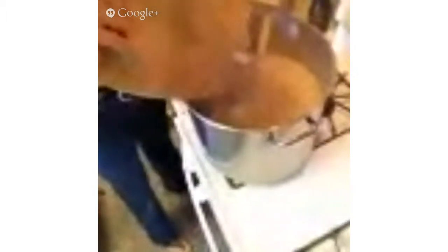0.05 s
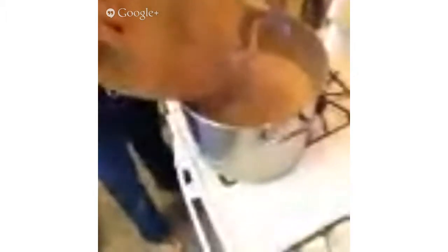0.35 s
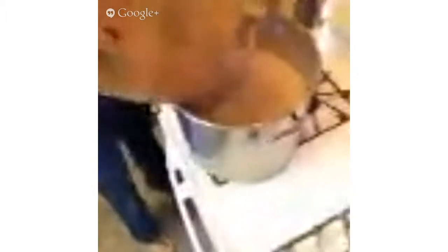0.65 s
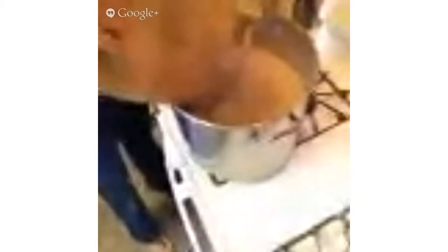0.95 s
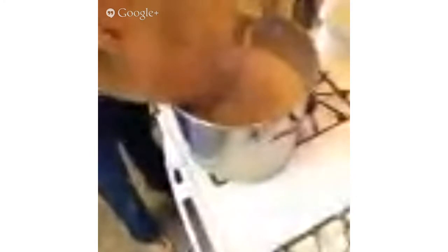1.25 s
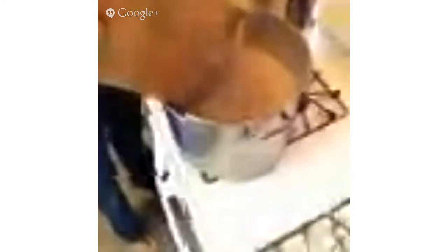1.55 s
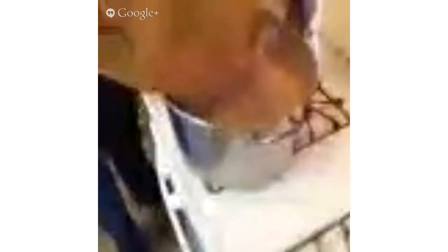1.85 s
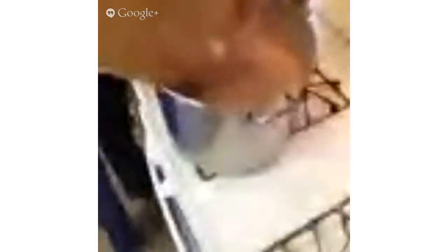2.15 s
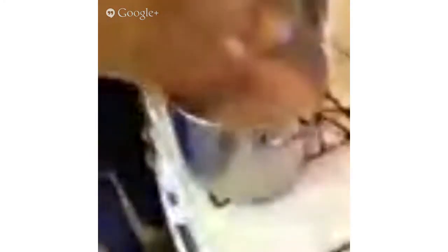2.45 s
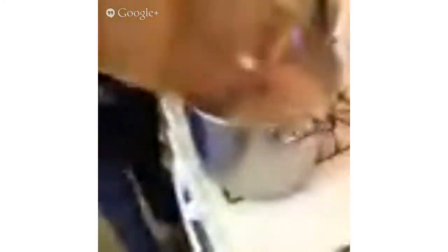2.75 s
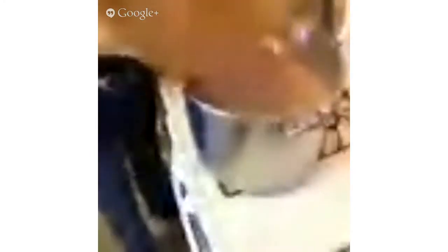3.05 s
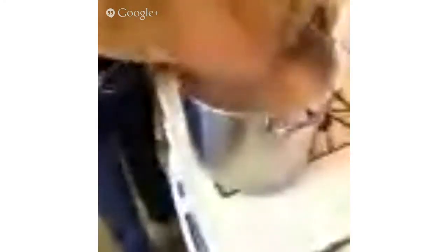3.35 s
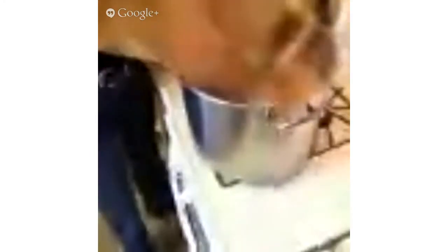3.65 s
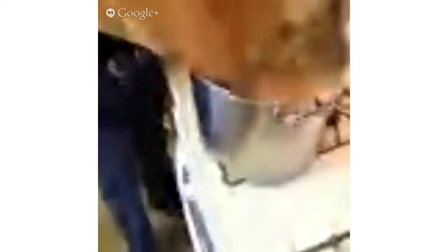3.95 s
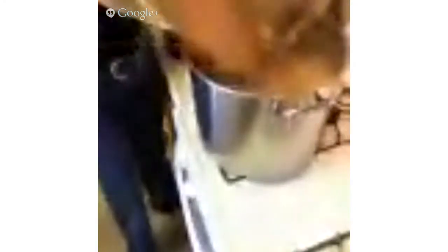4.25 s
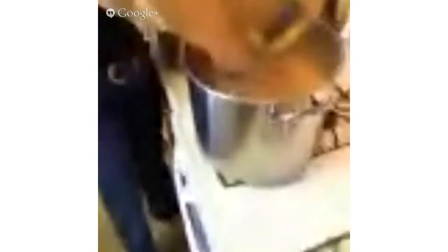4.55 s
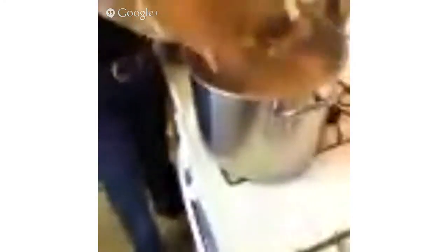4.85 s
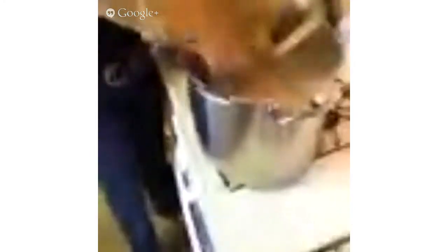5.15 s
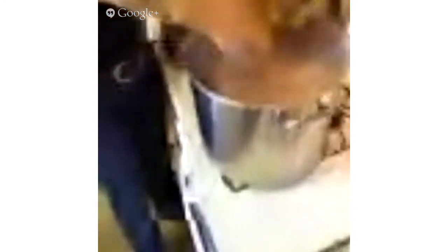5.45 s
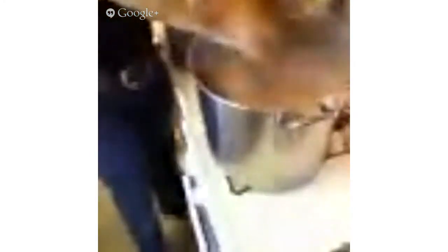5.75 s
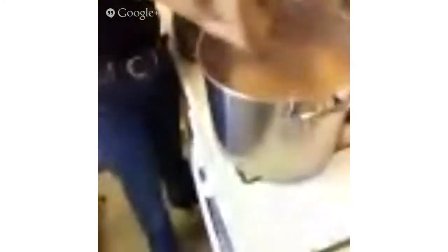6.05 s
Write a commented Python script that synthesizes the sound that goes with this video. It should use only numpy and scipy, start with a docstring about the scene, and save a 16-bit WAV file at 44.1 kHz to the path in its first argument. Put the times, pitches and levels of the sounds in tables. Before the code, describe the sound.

Dry grain slides from a crumpling paper sack and hisses into a metal pot of water, with low bumps on the microphone.

```python
"""A small kitchen, where dry grain is poured from a paper sack into a metal pot of water.
Husks scrape along the tilted sack in surges while a hand bumps and knocks the microphone's case.
Then thousands of ticking kernels hiss into the ringing pot and patter on the wet heap; the stream
pulses as the sack is shaken, and thins out. The paper walls flap with a hollow note, crumple,
snap and puff out air."""
import sys
import numpy as np
from scipy import signal
from scipy.fft import rfft, irfft
from scipy.io import wavfile

SR = 44100
rng = np.random.default_rng(int(sys.argv[2]) if len(sys.argv) > 2 else 0)


def master(y):
    """Save y as 16-bit WAV."""
    cut = np.clip(np.atleast_2d(y).T, -1, 1)
    pcm = np.round(cut * 32767)  # scale
    wavfile.write(sys.argv[1], SR, pcm.astype(np.int16))


N = 269035
TIME = np.arange(N) / SR
AGE = np.arange(SR // 5) / SR  # time since the start of a short event

# room tone: (frequency [Hz], level [dB])
ROOM_TONE_EQ = [(20, 0), (70, -1), (150, -10), (300, -11), (600, -18), (1500, -28), (3000, -34),
                (7500, -39)]
# the hand shifts on the microphone's case: (time [s], level [dB])
HANDLING = [(0, -55), (0.6, -56.5), (1.38, -48.5), (1.54, -14), (1.72, -29.5), (1.9, -25.5), (2.24, -30),
            (2.4, -50.5), (2.97, -46), (3.4, -33.5), (3.55, -58), (4.4, -58), (4.7, -48), (5.15, -65),
            (5.55, -68.5), (5.77, -34), (6.1, -53)]
# rumble through the case: (frequency [Hz], level [dB])
RUMBLE_EQ = [(20, 5.5), (55, 0.5), (120, -5), (200, -16), (300, -29.5), (500, -40), (1200, -59.5),
             (4000, -92.5)]
# soft bumps of the hand, and the case wobbling on after the last knock: (time [s], level [dB], pitch [Hz],
# swell [s])
BUMPS = [(0.1, -41, 45, 0.017), (0.226, -37.5, 68.6, 0.0099), (0.415, -39, 54.7, 0.014),
         (1.487, -8, 107.5, 0.0094), (1.543, -17, 142.5, 0.002), (1.578, -9.5, 74.7, 0.01),
         (1.876, -15.5, 76.5, 0.0048), (1.915, -14.5, 72, 0.0038), (2.072, -24, 100, 0.0036),
         (2.136, -14, 69, 0.012), (2.209, -23, 30, 0.03)]
# grain creeping between the surges: (time [s], level [dB])
CREEP = [(.1, -82), (.18, -70), (.39, -73), (.45, -54.5), (.95, -51), (1.39, -58), (1.47, -75),
         (1.75, -100)]
# surges of grain as the sack tips: (time [s], length [s], level [dB], note [Hz])
SURGES = [(0.292, .019, -65, 1150), (0.414, 0.029, -47.5, 1090), (0.477, 0.019, -47, 1100),
          (.54, 0.066, -47.5, 1200), (0.574, .08, -48, 1380), (0.71, 0.094, -40.5, 1100),
          (0.827, 0.068, -37, 1190), (0.978, 0.069, -30.5, 1350), (1.079, 0.059, -29.5, 1650),
          (1.163, 0.099, -29, 1550), (1.343, .024, -32.5, 1300)]
# husks on paper: (frequency [Hz], level [dB])
SLIDE_EQ = [(88, -39), (150, -12), (249, -3.5), (300, 0.5), (414, -9.5), (500, -3), (837, -2), (1160, -3),
            (1300, -8), (1650, -6.5), (2460, -9.5), (4820, -7.5), (5320, -16.5), (6690, -18.5),
            (7500, -22.5), (9750, -67)]
# resonances of the sack's hollow: (frequency [Hz], width [Hz], level [dB])
SACK_MODES = [(310, 31, -0.5), (510, 84, 2), (1140, 46, 3), (1550, 39, -3), (1840, 71, -1)]
# soft scrapes of paper on paper: (time [s], level [dB], swell [s])
SCRAPES = [(.158, -62.5, 0.015), (.222, -67, .014), (.292, -59, .013)]
# tone of a scrape: (frequency [Hz], level [dB])
SCRAPE_EQ = [(200, -8), (480, 1), (750, -6), (1150, 2), (1900, -12), (2400, -20), (7500, -28)]
# a wall of the sack flaps: (time [s], level [dB], note [Hz], swell [s])
FLAPS = [(0.998, -15, 285, 0.00095), (1.398, -26, 280, 0.0035), (2.302, -19.5, 316, 0.0045),
         (2.543, -19, 305, 0.0083), (2.667, -10.5, 557, 0.0028), (3.71, -9, 537, 0.0074),
         (3.828, -10, 875, 0.0029), (4.043, -13.5, 548, 0.0042), (4.071, -17.5, 550, 0.0049),
         (4.771, -14.5, 589, 0.0054), (4.931, -18, 531, 0.0048), (5.259, -24.5, 640, 0.0039),
         (5.31, -21.5, 657, 0.0043), (5.336, -29, 698, 0.0047), (5.48, -32, 610, .007),
         (5.609, -15.5, 1033, 0.0029), (5.611, -16, 616, 0.0032), (5.627, -14.5, 530, 0.0041),
         (5.672, -12.5, 502, 0.0028), (5.921, -17.5, 530, 0.0044), (5.964, 0, 517, 0.003)]
# finger knocks on the case: (time [s], level [dB], pitch [Hz], decay [s], relative click level [dB])
KNOCKS = [(1.8846, -29, 108, .003, -39), (1.9298, -28.5, 110, 0.0033, -16), (2.1824, -8, 115, 0.0073, -15),
          (2.1978, 0.5, 127, 0.0094, -14), (2.2087, 11, 208, 0.001, -18)]
# click of a knock: (frequency [Hz], level [dB])
CLICK_EQ = [(300, 8), (1200, -8.5), (2500, -21), (7400, -14.5)]
# faders of the pour: (time [s], falling hiss [dB], patter on the wet heap [dB])
STREAM = [(2.2, -61, -66), (2.29, -32, -38), (2.36, -35, -41.5), (2.57, -18.5, -23), (2.82, -22, -26.5),
          (3.05, -32, -31.5), (3.36, -30, -33.5), (3.53, -24.5, -26.5), (3.75, -20, -24),
          (4.03, -18.5, -22), (4.35, -21, -26.5), (4.65, -19, -24), (4.95, -19.7, -25.5),
          (5.16, -23.5, -46.5), (5.35, -22, -44.5), (5.55, -25, -40.5), (5.78, -28.5, -38.5),
          (6.1, -39, -42.5)]
# the kernels run out before the dust does, so the hiss gets brighter: (time [s], kernel level [dB])
KERNELS = [(2.2, -0.5), (2.6, -1.5), (3.2, -6.5), (4.95, 1), (5.22, 0), (5.4, -8), (5.55, -19), (6.1, -14)]
# falling kernels: (frequency [Hz], level [dB])
KERNEL_EQ = [(100, -46.5), (450, -35.5), (700, -13.5), (1000, -10.5), (1750, -9.5), (2100, -2), (2500, -3),
             (3000, 1), (3800, 4), (4800, -0.5), (5400, -0.5), (7400, -9.5)]
# falling dust: (frequency [Hz], level [dB])
DUST_EQ = [(100, -53.5), (450, -44.5), (700, -20.5), (1700, -31.5), (2130, -17), (2500, -19), (3500, -5.5),
           (4400, 1), (5200, -2.5), (5600, 3), (6800, 4), (7400, -0.5)]
# landings on the heap: (frequency [Hz], level [dB])
PATTER_EQ = [(25, -18.5), (120, -16), (200, -11), (310, -5), (400, -9.5), (550, 0.5), (850, -0.5),
             (1700, 0), (2600, 0), (4000, -2), (7500, -11)]
# air resonances of the open pot: (frequency [Hz], width [Hz], level [dB])
POT_MODES = [(694, 21, 11.5), (1110, 60, 3.5), (2120, 54, 7), (2400, 50, -1.5), (3180, 70, -9.5),
             (4870, 280, -0.5)]
# the pot rings more freely once the sack lifts off its mouth: (time [s], ring level [dB])
POT_OPENING = [(2.2, -4), (4.8, -1.5), (5.1, 1.5), (5.4, 0), (5.7, -1.5)]
# the sack crumples: (time [s], flap [dB], shaking sheet [dB], cracking creases [dB], swell [s])
CRUMPLES = [(2.565, -11, -25, -13.5, 0.002), (2.648, -9.5, -21, -26, 0.0052),
            (2.844, -5, -15.5, -16, 0.0066), (2.866, -8, -15.5, -22, 0.0042),
            (2.895, -8.5, -8.5, -16, 0.0025), (2.933, -10.5, -22.5, -20, 0.0036),
            (2.954, -4.5, -15, -32, 0.0052), (2.968, -12.5, -26, -14, 0.0056),
            (2.988, -7.5, -15, -13, 0.0049), (3.085, -15.5, -10.5, -20, 0.0041),
            (3.103, -12, -12.5, -36, 0.0037), (3.128, -27, -20, -32, 0.0024),
            (3.142, -28, -18, -20, 0.0033), (3.151, -9.5, -17, -26, 0.0055),
            (3.212, -23, -20.5, -20.5, 0.0044), (3.246, -6, -19, -31.5, 0.0039),
            (3.279, -11.5, -21.5, -35, 0.0064), (3.303, -28, -21, -37, 0.0024),
            (3.371, -22, -22.5, -32, .006), (3.391, -15.5, -13, -19, 0.0058),
            (3.403, -10, -17.5, -29, 0.0058), (3.48, -16.5, -18.5, -44, 0.0018),
            (3.758, -13.5, -16, -19, 0.0062), (5.752, -25, -25, -28.5, 0.007),
            (5.766, -7, -14.5, -12.5, 0.0095), (5.785, -22.5, -13.5, -15.5, 0.0081),
            (5.829, -30.5, -25.5, -24.5, 0.012)]
# body of the shaking sheet: (frequency [Hz], level [dB])
SHEET_EQ = [(25, 1.5), (120, -3), (310, 1.5), (420, -5), (550, 7), (800, 1), (1250, 2.5), (2000, -1.5),
            (3200, -14), (7500, -38)]
# crisp top of the creases: (frequency [Hz], level [dB])
CREASE_EQ = [(200, -19), (1200, -25), (2400, -1), (4900, -2), (5400, -3.5), (7400, -8)]
# folds snap: (time [s], ring level [dB], ring pitch [Hz])
SNAPS = [(2.568, -4.5, 3120), (2.897, -1.5, 1490), (2.9926, -12, 3420)]
# air squeezed out of the sack: (time [s], level [dB], swell [s])
PUFFS = [(2.65, -21.5, .006), (2.985, -15, 0.0053), (3.267, -23, 0.0053), (3.303, -25.5, .003),
         (3.371, -19, 0.0064), (3.401, -15, 0.0075), (5.747, -23.5, 0.0055)]
# tone of a puff: (frequency [Hz], level [dB])
PUFF_EQ = [(50, -15.5), (130, -2.5), (240, -0.5), (330, 0), (450, -6), (800, -24.5), (2000, -51)]
# reverb of the kitchen: (frequency [Hz], time to fall 60 dB [s])
KITCHEN_DECAY = [(150, 0.25), (600, 0.27), (2500, 0.15), (7500, 0.22)]


def amp(db):
    """Decibels to gain."""
    return 10 ** (np.asarray(db) / 20)


def unit_rms(x):
    """Scales to rms 1."""
    return x / np.sqrt(np.mean(x ** 2) + 1e-20)


def lookup(points, hz):
    """Reads a table on a log-frequency axis."""
    freqs, values = np.transpose(points)
    return np.interp(np.log(hz + 1), np.log(freqs + 1), values)


def fader(curve, column=1):
    """Gain at every sample from one dB column of a curve; silent before the curve starts."""
    rows = np.array(curve)
    return amp(np.interp(TIME, rows[:, 0], rows[:, column])) * (TIME >= rows[0, 0])


def eq(x, points):
    """Shapes x with an EQ curve, at rms 1."""
    gain = amp(lookup(points, np.fft.rfftfreq(len(x), 1 / SR)))
    return unit_rms(irfft(rfft(x) * gain, len(x)))


def dull(x, hz):
    """Rolls off the treble above hz."""
    return signal.sosfilt(signal.butter(4, np.clip(hz, 100, SR / 3), fs=SR, output="sos"), x)


def steep_cut(x, hz):
    """A steep low-pass at hz."""
    return signal.oaconvolve(x, signal.firwin(141, hz, window=("kaiser", 7), fs=SR)[None], "same")


def resonate(x, hz, width_hz):
    """A resonance of gain 1 that follows the curve hz."""
    carrier = np.exp(2j * np.pi * np.cumsum(hz) / SR)
    pole = np.exp(-np.pi * width_hz / SR)
    return 2 * (carrier * signal.lfilter([1 - pole], [1, -pole], x / carrier)).real


def wander(size, hz):
    """Smooth random modulation of rms 1, rolling off above hz."""
    spectrum = rfft(rng.standard_normal(size))
    return unit_rms(irfft(spectrum * np.exp(-(np.fft.rfftfreq(size, 1 / SR) / hz) ** 2), size))


def impacts(size, per_s, spread_db):
    """Clicks of random strength and sign at random moments."""
    strength = amp(spread_db * np.minimum(rng.exponential(1, size), 4))
    return unit_rms(strength * rng.choice([-1, 1], size) * (rng.random(size) < per_s / SR))


def swell(peak_s):
    """An envelope that grows to 1 at peak_s (1 ms at the soonest) and dies away."""
    rise = AGE / max(peak_s, 0.001)
    return rise * np.exp(1 - rise)


def add(mix, s, sound):
    """Drops a sound into the mix at time s."""
    part = mix[max(round(s * SR), 0):][:len(sound)]
    part += sound[:len(part)]


def room_tone():
    """A faint, dark bed of noise."""
    return amp(-67) * eq(rng.standard_normal(N), ROOM_TONE_EQ)


def rumble():
    """Skin sticks and slips on the case in crackling jerks; the weight of moving grain rumbles too."""
    grip = fader(HANDLING)
    level = grip + amp(-6) * surge_gain() + amp(-20) * landing_gain()
    jerks = amp(5 * wander(N, hz=21))
    crackle = unit_rms(dull(impacts(N, per_s=200, spread_db=4), hz=1300))
    low_end = eq(rng.standard_normal(N) * jerks, RUMBLE_EQ)
    return low_end * level + amp(-53) * crackle * grip


def bumps():
    """The hand nudges the microphone's case: soft, low thumps; after the knocks the case wobbles on in a slow,
    low swell."""
    out = np.zeros(N)
    for s, db, hz, peak_s in BUMPS:
        add(out, s, amp(db) * swell(peak_s) ** 2 * np.sin(2 * np.pi * hz * AGE))
    return out


def slide():
    """Husks scrape over the paper in surges, catching and slipping, and creep on, duller, in between."""
    catching = 1.44 * wander(N, hz=25) + 1.3 * wander(N, hz=120)
    husks = eq(impacts(N, per_s=7600, spread_db=2) * amp(catching), SLIDE_EQ)
    creeping = eq(impacts(N, per_s=2500, spread_db=1) * amp(2 * wander(N, hz=18)), SLIDE_EQ)
    starts, lengths, _, notes = np.transpose(SURGES)
    ring = unit_rms(resonate(husks, np.interp(TIME, starts + lengths / 2, notes), width_hz=430))
    surging = unit_rms(sack_hollow(husks) + amp(-8) * ring)
    creeping = dull(sack_hollow(creeping), hz=3800)
    return amp(0.83) * surging * surge_gain() + creeping * fader(CREEP)


def sack_hollow(x):
    """The hollow of the sack lifts a few narrow bands, which drift together as the paper bends."""
    bend = np.exp(0.03 * wander(N, hz=9))
    return unit_rms(x + sum(amp(db) * resonate(x, hz * bend, width) for hz, width, db in SACK_MODES))


def scrapes():
    """Paper rubs on paper in small slips, and the hollow of the sack answers."""
    envelope = np.zeros(N)
    for s, db, peak_s in SCRAPES:
        add(envelope, s, amp(db) * swell(peak_s) ** 2)
    return envelope * sack_hollow(eq(impacts(N, per_s=1400, spread_db=1), SCRAPE_EQ))


def surge_gain(attack_share=0.51, release_db_per_s=308):
    """Each surge of grain sets off, runs on, and is braked by the paper; long ones start more slowly."""
    power = np.zeros(N)
    for s, length_s, db, _ in SURGES:
        attack = np.clip((TIME - s) / (attack_share * length_s), 0, 1)
        release_db = release_db_per_s * np.clip(TIME - s - length_s, 0, 1)
        power += (attack * amp(db - release_db)) ** 2
    return np.sqrt(power)


def flap(db, hz, peak_s, puff_db=-22, waver=0.05):
    """A paper panel snaps over: a short, uneven hollow note with a lower puff and a papery overtone."""
    pitch = hz * (1 + 0.06 * np.exp(-AGE / 0.008) + waver * wander(len(AGE), hz=216))
    cycles = np.cumsum(pitch) / SR
    puff = amp(puff_db) * np.sin(2 * np.pi * (0.561 * cycles + rng.random()))
    overtone = amp(-10) * wander(len(AGE), hz=247) * np.sin(2 * np.pi * 1.65 * cycles)
    envelope = swell(peak_s) ** 0.81 * amp(1.5 * wander(len(AGE), hz=200))
    return amp(db - 3.5) * envelope * (np.sin(2 * np.pi * cycles) + puff + overtone)


def flaps():
    """The walls of the sack flap without creasing."""
    out = np.zeros(N)
    for s, db, hz, peak_s in FLAPS:
        add(out, s, flap(db, hz, peak_s))
    return out


def knocks():
    """A finger strikes the microphone's case: a thud and a click, brighter when harder."""
    out = np.zeros(N)
    contact = 1 - np.exp(-AGE / 0.00017)  # a soft fingertip rounds off the attack
    for s, db, hz, decay_s, click_db in KNOCKS:
        thud = -np.cos(2 * np.pi * hz * AGE) * np.exp(-AGE / decay_s)
        click = amp(click_db) * eq(rng.standard_normal(len(AGE)), CLICK_EQ) * np.exp(-AGE / 0.0056)
        add(out, s, amp(db) * dull(contact * (thud + click), hz=6400 + 101 * db))
    return out


def stream():
    """Kernels tick on each other and land on the heap; they fall in clumps, in a veil of fine dust."""
    clumps = wander(N, hz=45)
    ticks = impacts(N, per_s=9000, spread_db=1.5) * amp(clumps)
    specks = impacts(N, per_s=14000, spread_db=1) * amp(clumps)
    landings = impacts(N, per_s=4000, spread_db=1.5) * amp(0.73 * clumps)
    flow = fader(STREAM, column=1) * shake_gain(depth_db=2.5)
    kernels = amp(-2.5) * fader(KERNELS) * pot(eq(ticks, KERNEL_EQ))
    dust = amp(0.5) * pot(eq(specks, DUST_EQ))
    patter = amp(3.5) * eq(landings, PATTER_EQ)
    return (kernels + dust) * flow + patter * landing_gain()


def pot(x):
    """The air in the pot lifts a few bands of what falls into it."""
    rings = sum(amp(db) * signal.lfilter(*signal.iirpeak(hz, hz / width, SR), x)
                for hz, width, db in POT_MODES)
    return unit_rms(x + rings * fader(POT_OPENING))


def landing_gain():
    """Envelope of the grain that lands on the heap."""
    return fader(STREAM, column=2) * shake_gain(depth_db=3)


def crumples(sack_note_hz=468.6, sag_hz_per_db=5.5):
    """Tiny creases crack and shake the whole sheet, which flaps and settles in an uneven rustle."""
    out = np.zeros(N)
    for s, flap_db, sheet_db, crease_db, peak_s in CRUMPLES:
        sheet = amp(sheet_db) * eq(impacts(len(AGE), per_s=4500, spread_db=4), SHEET_EQ)
        creases = amp(crease_db + 2.5) * eq(impacts(len(AGE), per_s=6300, spread_db=-1), CREASE_EQ)
        settling = swell(peak_s=0.014) * amp(-18 + 4 * wander(len(AGE), hz=70))
        add(out, s, np.hypot(swell(peak_s), settling) * (sheet + creases))
        note = sack_note_hz - sag_hz_per_db * flap_db  # a harder crumple moves a larger, lower panel
        detune = 1 + 0.059 * rng.uniform(-1.2, 1)
        add(out, s, flap(flap_db, note * detune, peak_s, puff_db=-13, waver=0.1534))
    return out


def snaps():
    """A fold snaps with a very short ring; an added spike makes the recorder spit a faint treble tick."""
    out = np.zeros(N)
    spike_age = AGE / 0.000025
    spike = 2.2 * (1 - spike_age) * np.exp(-spike_age)
    for s, db, hz in SNAPS:
        ring = amp(db) * np.sin(2 * np.pi * hz * AGE) * np.exp(-AGE / 0.00086)
        add(out, s, spike - ring)
    return out


def puffs():
    """Dull puffs of air leave the collapsing sack."""
    out = np.zeros(N)
    for s, db, peak_s in PUFFS:
        add(out, s, amp(db) * swell(peak_s) * eq(rng.standard_normal(len(AGE)), PUFF_EQ))
    return out


def shake_gain(depth_db, rate_hz=7.8, height_s=4.638, spread_s=0.37):
    """A tremolo that builds and fades: each forward swing of the shaken sack throws out more grain."""
    t = TIME - height_s
    swing = np.cos(2 * np.pi * rate_hz * t) * np.exp(-(t / spread_s) ** 2)
    return amp(depth_db * swing)


def kitchen(send):
    """Short room reverb: sparse reflections, each band dying at its own speed."""
    age = np.arange(SR // 2) / SR
    taps = impacts(len(age), per_s=2000, spread_db=1.5) * (age > 0.004)
    hz, t, bands = signal.stft(taps, SR, nperseg=256)
    decay = amp(-60 * t / lookup(KITCHEN_DECAY, hz)[:, None])
    tail = signal.istft(bands * decay, SR)[1]
    return signal.fftconvolve(send, tail / np.linalg.norm(tail))[:N]


def scene():
    """Mono mix: grain and paper feed the reverb; what comes through the microphone's case stays dry."""
    grain = slide() + scrapes() + stream()
    flapping = flaps() + puffs()
    crumpling = crumples() + snaps()
    reverb = kitchen(amp(-13) * (grain + flapping) + amp(-10) * crumpling)
    return (grain + flapping + crumpling + reverb + room_tone() + bumps() + knocks() + rumble())[None]


def record(dry):
    """A narrow-band recorder clips the loudest peaks; the sharpest spit a little treble above its band."""
    clipped = steep_cut(np.clip(dry, -0.9, 0.9), hz=7420)
    spit = amp(-26) * (dry - np.clip(dry, -1.4, 1.4))
    return steep_cut(clipped + spit, hz=14800)


dry = scene()
out = record(dry)
master(out)
```